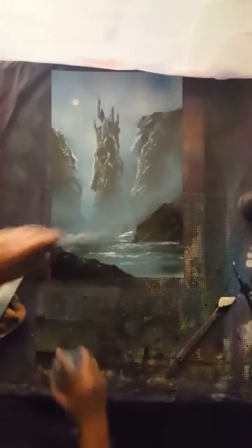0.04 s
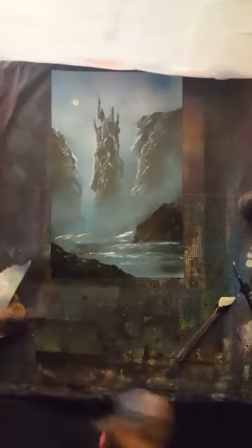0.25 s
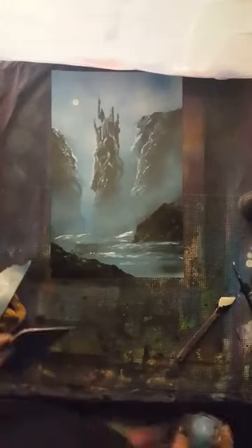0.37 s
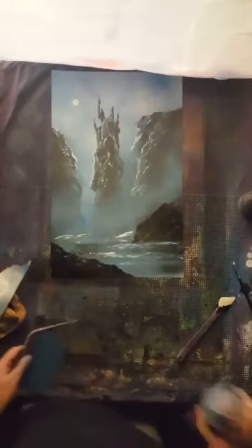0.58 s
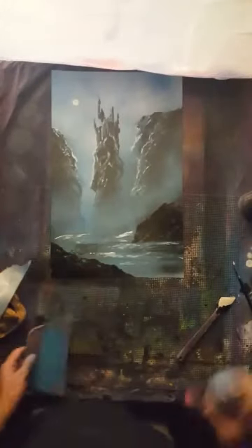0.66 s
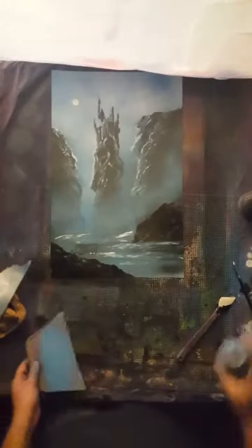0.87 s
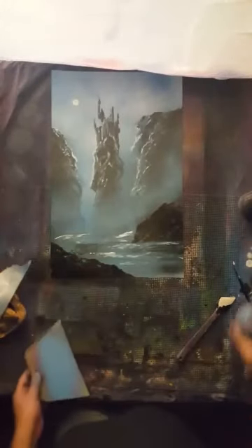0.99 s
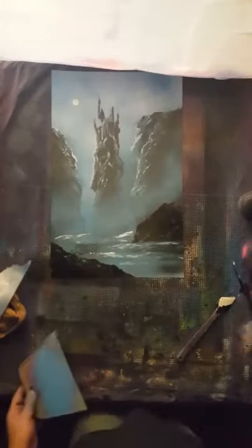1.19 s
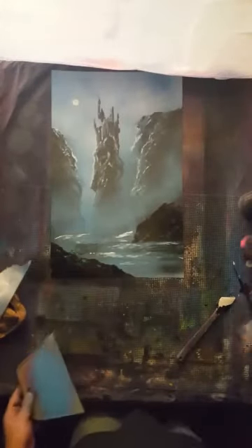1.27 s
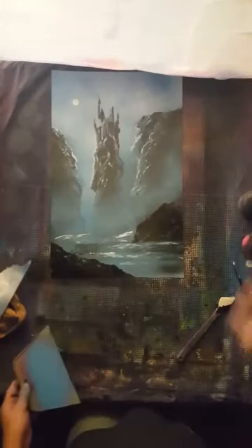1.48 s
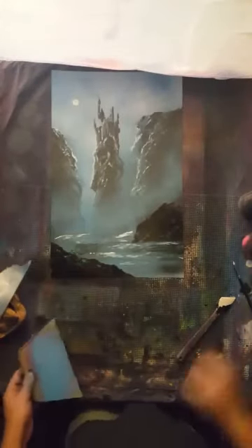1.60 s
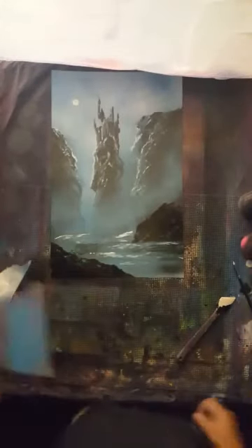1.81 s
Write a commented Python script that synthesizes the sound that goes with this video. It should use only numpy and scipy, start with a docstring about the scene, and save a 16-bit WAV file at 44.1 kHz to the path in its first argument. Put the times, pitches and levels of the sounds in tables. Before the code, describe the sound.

Hard metallic clacks from a mixing ball inside a hand-held paint can, slowing to lighter taps; the can is put down with a low thud, ball settling, then a dull hollow knock in a quiet small room.

```python
"""Spray paint can shaken and set down

A mixing ball clacks on the can's ends, rings its wall and rolls along it while the paint hisses.
The can is set down with a thud, the ball clatters to rest, and a soft hollow knock follows.
Contacts are impulses with grainy scatter through resonances; rolling is dense tiny contacts;
hiss is filtered noise. A small room adds a diffuse tail, over quiet air noise and a low hum.
"""
import sys
import numpy as np
from scipy import signal
from scipy.fft import rfft, irfft
from scipy.io import wavfile

SR = 44100
rng = np.random.default_rng(int(sys.argv[2]) if len(sys.argv) > 2 else 0)


def generate_wav(signal):
    """Clip the signal to [-1, 1] and save it as 16-bit WAV at the path in sys.argv[1]."""
    frames = np.transpose(np.atleast_2d(signal))
    scaled = np.clip(frames, -1, 1) * 32767
    pcm = np.round(scaled).astype(np.int16)
    wavfile.write(sys.argv[1], SR, pcm)


N = 81585
TIME = np.arange(N) / SR


def from_db(db):
    """Decibels to gain."""
    return 10 ** (np.asarray(db) / 20)


def rms_one(x):
    """Scale to rms 1."""
    return x / np.sqrt(np.mean(x ** 2) + 1e-20)


def energy_one(x):
    """Scale to energy 1."""
    return x / np.sqrt(np.sum(x ** 2) + 1e-20)


def level_curve(rows):
    """Gain over time, interpolated in dB between rows of seconds and dB."""
    return from_db(np.interp(TIME, *np.transpose(rows)))


def add(out, start_s, sound):
    """Mix a sound in at a time, cut off at the end."""
    start = int(start_s * SR)
    out[start:start + len(sound)] += sound[:N - start]


def butter_filter(order, cutoff_hz, kind, x):
    """Butterworth filter."""
    return signal.sosfilt(signal.butter(order, cutoff_hz, kind, fs=SR, output="sos"), x)


def flutter(spread_db, values_per_s=70.26):
    """A quickly and randomly wavering gain."""
    values = np.clip(rng.standard_normal(N), -2, 2)
    return from_db(spread_db * np.interp(TIME * values_per_s, np.arange(N), values))


def ringing(modes, size=4000):
    """A click through parallel two-pole resonances of alternating sign; energy 1."""
    out = 0
    click = signal.unit_impulse(size) + 1e-18
    for k, (hz, width_hz, db) in enumerate(modes):
        radius = np.exp(-np.pi * width_hz / SR)
        poles = [1, -2 * radius * np.cos(2 * np.pi * hz / SR), radius ** 2]
        edge = (1 - radius ** 2) / 2
        out = out + (-1) ** k * from_db(db) * signal.lfilter([edge, 0, -edge], poles, click)
    return energy_one(out)


SCATTER_T60_S, SCATTER_GRAIN_DB = 0.071, 4.5


def contact(scatter_db, size=4000):
    """One sharp impulse, then dying grainy scatter: chatter and near reflections; energy 1."""
    # the grain level changes every 16 samples
    grain_db = SCATTER_GRAIN_DB * np.repeat(rng.standard_normal(size // 16), 16)
    grains = rng.standard_normal(size) * from_db(grain_db)
    decay = from_db(-60 * TIME[:size] / SCATTER_T60_S)
    force = from_db(scatter_db) * energy_one(grains * decay)
    force[0] += 1
    return energy_one(force)


def soft_blow(modes, contact_s, scatter_db, size=1000):
    """A cushioned contact rises and dies smoothly, driving a body's modes; energy 1."""
    push = TIME[:size] * np.exp(-TIME[:size] / contact_s)
    force = signal.fftconvolve(push, contact(scatter_db))
    return energy_one(signal.fftconvolve(force, ringing(modes)))


def favoured(modes, spot_hz, focus_db, focus_octaves=0.1):
    """The place struck strengthens modes near its pitch."""
    favoured_modes = []
    for hz, width_hz, db in modes:
        distance = np.log2(hz / spot_hz) / focus_octaves
        favoured_modes.append((hz, width_hz, db + focus_db * np.exp(-distance ** 2)))
    return favoured_modes


# Air noise colour. Each row: frequency in Hz, relative spectral level in dB.
AIR_COLOUR = [(25, -2.5), (60, -7.5), (100, 1), (200, -2.5), (400, -4), (650, -3), (1100, -8), (2000, -13),
              (3500, -30), (6000, -37), (14000, -34)]
# Air noise swell and sink. Each row: time in seconds, relative level in dB.
AIR_SWELL = [(0, -2.5), (.3, -0.5), (1.45, 1), (1.62, 0.5), (1.85, -2.5)]
AIR_DB = -63  # before the swell
HUM_HZ, HUM_DB = 64.2, -73


def room_noise():
    """Coloured air noise swells a little and sinks over a steady low sine hum."""
    hz, db = np.transpose(AIR_COLOUR)
    bin_hz = np.fft.rfftfreq(N, 1 / SR) + 1  # +1 avoids log of zero
    colour = from_db(np.interp(np.log(bin_hz), np.log(hz), db))
    air = rms_one(irfft(rfft(rng.standard_normal(N)) * colour, N))
    hum = rms_one(np.sin(2 * np.pi * (HUM_HZ * TIME + rng.random())))
    return from_db(AIR_DB) * level_curve(AIR_SWELL) * air + from_db(HUM_DB) * hum


# Room tail. Each row: frequency in Hz, 60 dB decay time in seconds, relative level in dB.
ROOM_TAIL = [(148, 0.31, -9.5), (660, 0.47, -11.5), (1670, 0.19, -13), (4100, 0.26, -13.5),
             (11300, 0.18, -7)]
ROOM_BUILD_S = 0.005


def room(x, size=30000):
    """Diffuse tail: noise bands about an octave wide build up and die at their own rates."""
    hz, t60_s, db = np.transpose(ROOM_TAIL)
    edges_hz = np.geomspace(60, 15500, num=9)
    t = TIME[:size]
    tail = 0
    for low_hz, high_hz in zip(edges_hz, edges_hz[1:]):
        log_centre = np.log(low_hz * high_hz) / 2
        band_t60_s = np.interp(log_centre, np.log(hz), t60_s)
        band_db = np.interp(log_centre, np.log(hz), db)
        envelope = from_db(-60 * t / band_t60_s) * (1 - np.exp(-t / ROOM_BUILD_S))
        noise = butter_filter(2, [low_hz, high_hz], "band", rng.standard_normal(size))
        tail = tail + from_db(band_db) * energy_one(envelope) * noise
    return signal.fftconvolve(x, tail)[:N]


# Work table resonances. Each row: frequency in Hz, width in Hz, relative level in dB.
TABLE_MODES = [(118, 34, -4.5), (193.4, 21, 3), (264, 130, -6), (360, 52, -1)]
SET_DOWN_S, THUD_DB, THUD_CONTACT_S, THUD_SCATTER_DB = 1.1205, -10.5, 0.00048, -0.5
# Hollow knock, a quick run of soft contacts. Each row: start in seconds, level in dB.
KNOCKS = [(1.548, -22.5), (1.5525, -20.5), (1.5573, -16), (1.581, -30)]
# Hollow body resonances. Each row: frequency in Hz, width in Hz, relative level in dB.
KNOCK_MODES = [(154, 77, -18), (362, 41, -4), (616, 35, 4.5), (827, 46, -3), (980, 110, -5),
               (1690, 590, -15), (3250, 1200, -17)]
KNOCK_CONTACT_S, KNOCK_SCATTER_DB = 0.00008, -2
KNOCKS_LOW_CUT_HZ = 59  # keeps the thud and knock free of deep bass


def knocks():
    """The can thuds on the table; later something hollow is nudged; both are soft blows."""
    out = np.zeros(N)
    thud = soft_blow(TABLE_MODES, THUD_CONTACT_S, THUD_SCATTER_DB)
    add(out, SET_DOWN_S, from_db(THUD_DB) * thud)
    for start_s, db in KNOCKS:
        knock = soft_blow(KNOCK_MODES, KNOCK_CONTACT_S, KNOCK_SCATTER_DB)
        add(out, start_s, from_db(db) * knock)
    return butter_filter(2, KNOCKS_LOW_CUT_HZ, "high", out)


# Paint hiss level. Each row: time in seconds, level in dB.
HISS_LEVEL = [(.12, -65.5), (.27, -61), (.32, -45.5), (.38, -48.5), (.42, -54.5), (.47, -60), (.7, -64)]
# Paint hiss colour. Each row: frequency in Hz, width in Hz, relative level in dB.
HISS_MODES = [(2690, 990, 12.5), (10600, 9100, -3)]
HISS_FLUTTER_DB = 1


def paint_hiss():
    """The spattering paint: fluttering noise through broad resonances."""
    spatter = rng.standard_normal(N) * flutter(HISS_FLUTTER_DB)
    hiss = signal.fftconvolve(spatter, ringing(HISS_MODES))[:N]
    return level_curve(HISS_LEVEL) * rms_one(hiss)


# Ball rolling and paint swilling. Each row: time in seconds, level in dB.
ROLL_LEVEL = [(.05, -84.5), (.145, -53), (.23, -55.5), (.31, -45), (.38, -46.5), (.44, -42), (.54, -44.5),
              (.62, -47), (.69, -48.5), (.76, -73), (.95, -100)]
# Side wall, damped by the hand. Each row: frequency in Hz, width in Hz, relative level in dB.
WALL_MODES = [(1062, 58, -6), (1227, 61, 1), (1417, 99, -5), (1650, 90, 2), (1765, 81, -3.5), (1908, 75, 3),
              (2217, 103, 0)]
# Domed ends. Each row: frequency in Hz, width in Hz, relative level in dB.
END_MODES = [(357, 52, -8), (614, 88.4, 4), (857, 66.6, 3.5), (1085, 170, -3), (1500, 110, -12.5),
             (2415, 250, -4), (2740, 150, -1), (2900, 63, -0.5), (3562, 182, 1.5), (3812, 78, -1.5),
             (4268, 273, 1), (4700, 980, -10.5)]
ROLL_ENDS_DB, ROLL_GRAINS_PER_S, ROLL_SPREAD_DB, ROLL_FLUTTER_DB = -1, 2200, 4, 3.5
ROLL_SOFT_HZ = 3130  # rolling contacts are softer than strikes


def ball_roll():
    """Dense tiny contacts of the travelling ball stir each of the can's modes by turns."""
    hits = rng.random(N) < ROLL_GRAINS_PER_S / SR
    signs = rng.choice([-1, 1], N)
    sizes = from_db(ROLL_SPREAD_DB * np.minimum(rng.exponential(1, N), 4))
    grains = butter_filter(4, ROLL_SOFT_HZ, "low", hits * signs * sizes)
    ends = [(hz, width_hz, db + ROLL_ENDS_DB) for hz, width_hz, db in END_MODES]
    roll = np.zeros(N)
    for hz, width_hz, db in [*WALL_MODES, *ends]:
        stirred = grains * flutter(ROLL_FLUTTER_DB)
        ring = ringing([(hz, width_hz, db)])  # energy 1, so db is applied below
        roll += from_db(db) * np.sqrt(width_hz) * signal.fftconvolve(stirred, ring)[:N]
    return level_curve(ROLL_LEVEL) * rms_one(roll)


# Ball strikes. Each row: start in seconds, relative clack level in dB, clack tilt in dB per octave,
# relative wall ring level in dB, relative tick level in dB, scatter in dB re the impulse,
# then the pitches favoured by the place struck: wall in Hz, ends in Hz, tick in Hz.
STRIKES = [(.1496, -55, 9, -41, -66, 10, 1940, 2800, 10500),
           (0.2445, -27, -2.5, -28.5, -45.5, -0.5, 1065, 620, 9500),
           (0.2486, -30, 1, -28.5, -48.5, 16, 1720, 3800, 6300),
           (0.2859, -22.5, 0.5, -33, -37, 2.5, 1920, 635, 8900),
           (0.3254, -25, 1, -18.5, -51, 4, 1840, 2820, 8800), (.357, -25, 1, -39, -40, 7, 1950, 4010, 8900),
           (0.3915, -32.5, -1, -30.5, -53, 1.5, 1770, 2410, 10800),
           (0.401, -30.5, -3, -30, -54, 6, 1600, 2400, 10800),
           (0.4669, -17, -1, -28.5, -38, -5.5, 1900, 4415, 11360),
           (0.5259, -24.5, -2, -23.5, -50.5, -7, 1294, 2450, 9900),
           (0.5787, -27, 2, -20, -44, -11, 1660, 3470, 9720),
           (0.5822, -34, -3.5, -30.5, -63, 7, 1230, 3520, 12500),
           (0.7048, -18.5, 1.5, -28, -39.5, -3, 2390, 662, 11030),
           (0.8112, -26.5, -1, -51, -47.5, 3, 1450, 798, 9450),
           (0.831, -66, 19, -38.5, -55, 10, 1870, 2410, 8800),
           (0.8711, -32, 0.2, -45, -55, -4, 2190, 810, 6300),
           (0.936, -36, 0.2, -47, -54.5, 1.5, 2200, 850, 6300),
           (0.9886, -36, -2, -45, -54.5, -1, 2190, 4470, 6300),
           (1.0045, -37.5, -1, -40, -54, 2.5, 1940, 2820, 10800),
           (1.0175, -39, -2.5, -45, -62, 0, 1930, 4100, 12500),
           (1.058, -43.5, -1, -49, -58, 8, 1810, 850, 10800),
           (1.089, -37.5, -2.5, -43, -53.5, 9, 1710, 3600, 6540),
           (1.122, -33, -1.5, -33, -58, 14, 1750, 850, 8800),
           (1.129, -30, -.5, -37.5, -44.5, 1.5, 1884, 2400, 6600),
           (1.2174, -52, 8, -47.5, -71, -1, 1730, 2400, 10800),
           (1.2394, -27, 1.5, -35, -44.5, -0.5, 1670, 825, 6500),
           (1.2858, -32.5, -3.5, -43, -56.5, 0.5, 1690, 650, 6300),
           (1.297, -39, 2.5, -42, -66, 3, 3050, 2950, 8800),
           (1.3339, -37, -.5, -47.5, -57, -11, 1750, 3580, 12500),
           (1.351, -35, -3, -40, -55, -8, 1800, 2660, 10800),
           (1.3631, -33.5, -0.5, -49, -60, 0.5, 1730, 3520, 10800),
           (1.4014, -36.5, 1, -42.5, -59.5, 0, 1790, 3520, 10800),
           (1.4399, -44.5, -4, -50.5, -72, 3, 1730, 3540, 10800),
           (1.6306, -51.5, -5, -60, -76, 16, 1890, 2750, 8800),
           (1.7355, -53.5, -8, -58, -85, -9, 1450, 2880, 8800),
           (1.8283, -53, -4.5, -61.5, -87, -6, 1300, 3500, 8800)]
# Hard contact itself. Each row: frequency in Hz, width in Hz, relative level in dB.
TICK_MODES = [(6430, 1200, -2.5), (8900, 1300, -0.5), (10350, 2500, -1.5), (12700, 1900, -3)]
# Longer wall ring of the standing can. Each row: frequency in Hz, width in Hz, relative level in dB.
FREE_MODES = [(1737, 17, -3.5), (2905, 18, -3), (3050, 20, -1.5), (3660, 40, -5)]
# added to the levels in STRIKES; crack follows the clack level, free ring the wall level
CRACK_DB, CLACK_DB, WALL_DB, TICK_DB, FREE_DB = 11.5, 18, 22, 22, 18.5
CRACK_LOW_HZ, CRACK_HIGH_HZ = 440, 4810
TICK_LAG_S, TICK_SCATTER_DB = 0.0008, 28  # the tick follows the crack
WALL_FOCUS_DB, END_FOCUS_DB, TICK_FOCUS_DB = 10, 6.5, 7
END_DETUNE = 0.004  # spread as a fraction of frequency
RELEASE_S = 1.2  # later strikes ring freely: the hand has let go


def dry_crack():
    """The dry first impulse of a strike, band-limited; energy 1."""
    crack = butter_filter(2, CRACK_LOW_HZ, "high", signal.unit_impulse(500))
    return energy_one(butter_filter(6, CRACK_HIGH_HZ, "low", crack))


def varied_ends(tilt_db, end_hz):
    """The ends' pitches vary slightly at random per strike; brightness tilts about the favoured pitch."""
    modes = []
    for hz, width_hz, db in END_MODES:
        varied_hz = hz * (1 + END_DETUNE * rng.standard_normal())
        modes.append((varied_hz, width_hz, db + tilt_db * np.log2(hz / end_hz)))
    return modes


def ball_strikes():
    """Each strike cracks, clacks on the ends, ticks and rings the wall, coloured by the place it hits."""
    out = np.zeros(N)
    crack = dry_crack()
    for start_s, clack_db, tilt_db, wall_db, tick_db, scatter_db, wall_hz, end_hz, tick_hz in STRIKES:
        force = contact(scatter_db)
        ends = ringing(favoured(varied_ends(tilt_db, end_hz), end_hz, END_FOCUS_DB))
        wall = ringing(favoured(WALL_MODES, wall_hz, WALL_FOCUS_DB))
        tick_body = ringing(favoured(TICK_MODES, tick_hz, TICK_FOCUS_DB))
        clack = energy_one(signal.fftconvolve(force, ends))
        wall_ring = energy_one(signal.fftconvolve(force, wall))
        tick = signal.fftconvolve(contact(TICK_SCATTER_DB), tick_body)
        add(out, start_s, from_db(clack_db + CRACK_DB) * crack)
        add(out, start_s, from_db(clack_db + CLACK_DB) * clack)
        add(out, start_s, from_db(wall_db + WALL_DB) * wall_ring)
        add(out, start_s + TICK_LAG_S, from_db(tick_db + TICK_DB) * tick)
        if start_s > RELEASE_S:
            free_ring = ringing(favoured(FREE_MODES, wall_hz, WALL_FOCUS_DB), size=12000)
            add(out, start_s, from_db(wall_db + FREE_DB) * free_ring)
    return out


def scene():
    """The can and the knocks, direct and through the room, over the room noise."""
    direct = knocks() + paint_hiss() + ball_roll() + ball_strikes()
    return (room_noise() + room(direct) + direct)[None]


CUTOFF_HZ = 14000


def record(dry):
    """The top is cut steeply by an elliptic low-pass."""
    low_pass = signal.ellip(10, 0.2, 70, CUTOFF_HZ, fs=SR, output="sos")
    return signal.sosfilt(low_pass, dry)


dry = scene()
out = record(dry)
generate_wav(out)
```